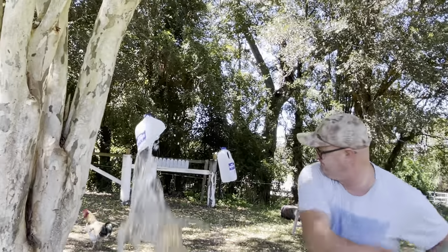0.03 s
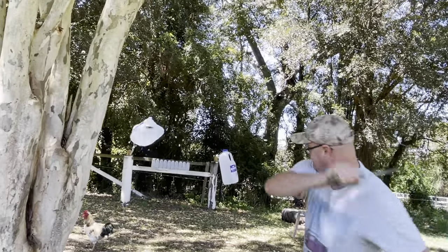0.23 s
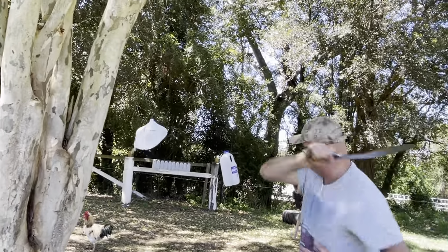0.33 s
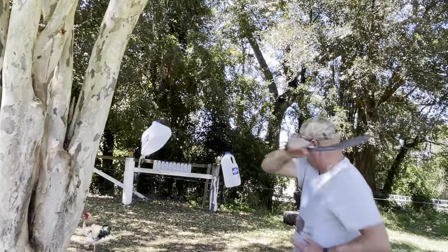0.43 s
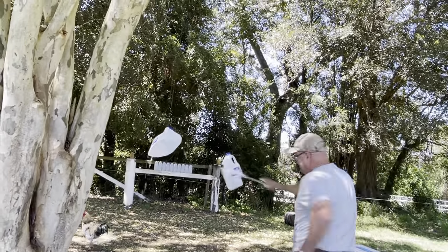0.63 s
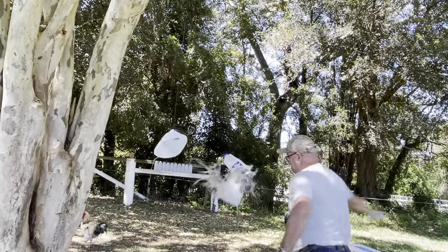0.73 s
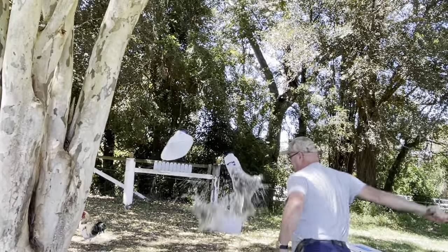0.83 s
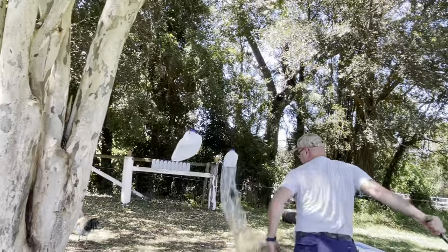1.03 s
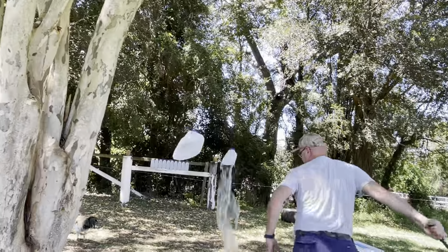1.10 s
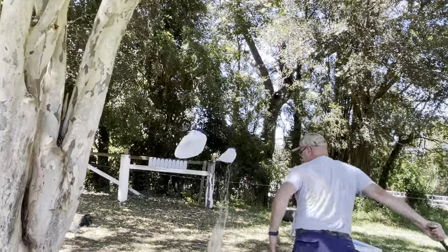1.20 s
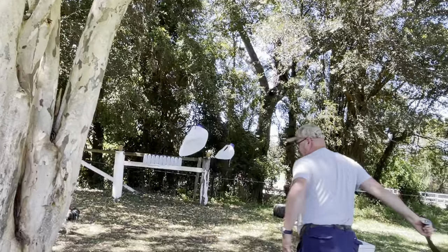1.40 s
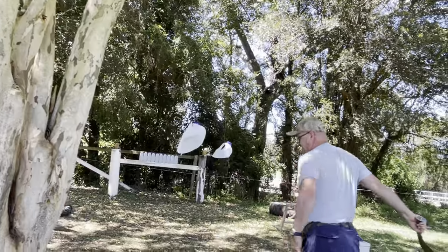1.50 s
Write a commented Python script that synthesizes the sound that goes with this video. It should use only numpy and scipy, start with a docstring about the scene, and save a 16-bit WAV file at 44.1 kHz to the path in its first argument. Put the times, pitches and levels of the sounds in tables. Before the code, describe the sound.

A blade chops through three water-filled plastic jugs outdoors, with water splashing down.

```python
"""Low wind, a faint hiss of trees and a sharp tick come first; then a long blade chops through three
hanging, water-filled plastic jugs. Each cut tears the near wall, thumps the water and bursts the far
wall, and the opened air cavity gurgles as a gliding resonance. The steel rings thinly, most after the
second cut. Spray hisses, and spilled water patters on dry leaves and traps small ringing bubbles."""
import sys
import numpy as np
from scipy import signal
from scipy.fft import rfft, irfft
from scipy.io import wavfile
from scipy.ndimage import uniform_filter1d

SR = 44100
rng = np.random.default_rng(int(sys.argv[2]) if len(sys.argv) > 2 else 0)


def transcribe(u):
    """Save the signal u as a 16-bit wav file named by the first command-line argument.

    u: samples, shape (n,) or (channels, n), limited to [-1, 1]; the rate is SR.
    q: integer samples, one column per channel.
    """
    v = np.clip(np.atleast_2d(u).T, -1, 1)
    q = np.round(v * 32767).astype(np.int16)
    wavfile.write(sys.argv[1], SR, q)


N = 68355
T = np.arange(N) / SR
BIN_HZ = np.arange(N + 1) * SR / (2 * N)


def undb(db):
    """Amplitude ratio of a level in decibels."""
    return 10 ** (np.asarray(db) / 20)


def gains(points, hz):
    """Magnitude response of a (frequency [Hz], level [dB]) curve, interpolated in log frequency."""
    corner_hz, db = np.array(points, float).T
    return undb(np.interp(np.log(np.maximum(hz, 1)), np.log(corner_hz), db))


def level(curve):
    """Amplitude envelope through (time [s], level [dB]) points."""
    return undb(np.interp(T, *np.array(curve).T))


def strike(at, rise, decay):
    """Transient envelope: exponential growth to a peak, then exponential decay."""
    return np.exp(-np.maximum((at - T) / max(rise, 1e-5), (T - at) / max(decay, 1e-5)))


def colour(x, points, tilt_db_per_oct=0):
    """Minimum-phase filter with a tilted spectrum, normalised to conserve the power of white noise."""
    octaves = np.log2(np.maximum(BIN_HZ, 200) / 1000)
    magnitude = gains(points, BIN_HZ) * undb(tilt_db_per_oct * octaves)
    magnitude /= np.sqrt(np.mean(magnitude ** 2))
    cepstrum = irfft(np.log(magnitude))[:N]
    cepstrum[1:] *= 2
    return irfft(rfft(x, 2 * N) * np.exp(rfft(cepstrum, 2 * N)))[..., :N]


def stereo(pair, side_curve):
    """Mid-side synthesis: a filtered difference signal adds on the left and subtracts on the right."""
    mid = pair[0]
    side = irfft(rfft(pair[1], 2 * N) * gains(side_curve, BIN_HZ))[:N]
    return np.array([mid + side, mid - side])


def crackle(grain_db, size):
    """Random amplitude modulation: two noises of unit rms share uneven grains, `size` samples long."""
    strength = np.repeat(undb(grain_db * rng.standard_normal(N // size + 1)), size)[:N]
    grains = rng.standard_normal((2, N)) * strength
    return grains / np.sqrt(uniform_filter1d(grains ** 2, size=size * 24, axis=1))


def resonance(hz, width, envelope):
    """A randomly driven resonator gives narrow-band noise; its rms follows the envelope."""
    lowpass = signal.butter(2, width / 2, fs=SR, output="sos")
    drive = signal.sosfilt(lowpass, rng.standard_normal(N) + 1j * rng.standard_normal(N))
    carrier = np.exp(2j * np.pi * np.cumsum(hz * np.ones(N)) / SR)
    ring = np.real(drive * carrier) * envelope
    return ring * np.sqrt(np.sum(envelope ** 2) / np.sum(ring ** 2))


def falling_tone(at, hz, oct_per_s, span_s):
    """Exponential glide: a cosine crests at time `at` and falls in pitch for span_s on either side."""
    cycles = np.cumsum(hz * 2 ** (-oct_per_s * np.clip(T - at, -span_s, span_s))) / SR
    return np.cos(2 * np.pi * (cycles - np.interp(at, T, cycles)))


# strength of the gusts (time [s], level [dB])
WIND_ENVELOPE = [(0, -43.5), (.08, -48), (.2, -41.5), (.34, -50), (.4, -42.5), (.6, -45.5), (.87, -45.5),
                 (1.02, -40), (1.06, -45.5), (1.11, -37), (1.23, -44.5), (1.28, -37), (1.39, -44.5),
                 (1.55, -38)]
# spectra of the wind and the trees (frequency [Hz], relative level [dB])
WIND_SPECTRUM = [(15, -48), (28, -26.5), (46, -3), (85, -1.5), (125, -13.5), (200, -21), (400, -32),
                 (1500, -63)]
TREE_SPECTRUM = [(100, 14.5), (400, 2), (900, 4.5), (2000, -9.5), (5000, -15), (8000, -11),
                 (13000, -14), (16000, -29)]
# stereo width of spread-out sources (frequency [Hz], side relative to mid [dB])
WIDE_SPREAD = [(60, -10), (400, -5), (1200, -4.5), (2400, -1.5), (4400, -0.5), (8000, -10), (11500, -4.5),
               (16000, -35)]


def wind_and_trees():
    """Turbulent flow makes broadband noise: gusts rumble under a faint, steady hiss of trees."""
    wind = level(WIND_ENVELOPE) * colour(rng.standard_normal((2, N)), WIND_SPECTRUM)
    trees = undb(-53.5) * colour(crackle(grain_db=2.5, size=64), TREE_SPECTRUM)
    return stereo(wind + trees, WIDE_SPREAD)


# single drops and snaps (time [s], tick level [dB], body relative to tick [dB])
DROP_IMPACTS = [(0.066, -17.5, -9.5), (0.1136, -32, -12), (.1735, -31, -19), (0.3738, -25.5, -2),
                (0.4974, -31, 5.5), (0.5089, -29, -1), (0.532, -30, -1), (0.5951, -25, -10),
                (.7009, -16, -12), (.709, -15, -8), (.963, -46, 9), (1.476, -45, 7)]
# spectra of the tick and the body (frequency [Hz], relative level [dB])
TICK_SPECTRUM = [(500, -45), (3000, -29), (8000, -17), (13500, 9), (16000, 7.5)]
BODY_SPECTRUM = [(150, 7), (450, -9.5), (850, 2), (1500, -0.5), (2800, -0.5), (6000, -7), (9000, -2.5),
                 (16000, -28)]
# stereo width of nearby sources (frequency [Hz], side relative to mid [dB])
NEAR_SPREAD = [(60, -31), (400, -21), (1000, -12), (2200, -2.5), (4400, 1), (8000, -5.5), (11500, -3.5),
               (16000, -32)]


def drops(tick_decay_s=0.00039, body_decay_s=0.0013):
    """A brief impact has a broad spectrum: a bright tick with a duller, slightly longer body."""
    tick = sum(undb(db) * strike(at, 0, tick_decay_s) for at, db, _ in DROP_IMPACTS)
    body = sum(undb(db + rel) * strike(at, 0, body_decay_s) for at, db, rel in DROP_IMPACTS)
    tick_noise, body_noise = np.sign(rng.standard_normal((2, 2, N)))
    impacts = colour(tick_noise * tick, TICK_SPECTRUM) + colour(body_noise * body, BODY_SPECTRUM)
    return stereo(impacts, NEAR_SPREAD)


# flow of airborne spray and of water landing on the leaves (time [s], level [dB])
SPRAY_ENVELOPE = [(0, -85), (.14, -60), (.2, -36.5), (.235, -31.5), (.28, -35.5), (.34, -40.5),
                  (.43, -26.5), (.5, -41), (.55, -41.5), (.69, -48.5), (.72, -41), (.79, -51), (.9, -57.5),
                  (1.12, -50), (1.16, -35), (1.26, -38.5), (1.34, -34.5), (1.42, -44.5), (1.55, -48.5)]
SPILL_ENVELOPE = [(0, -62), (.17, -60.5), (.24, -34), (.29, -44), (.34, -49), (.4, -43.5), (.46, -44.5),
                  (.5, -32.5), (.56, -81), (.6, -44), (.68, -54.5), (.76, -49), (.88, -54.5), (1.12, -62.5),
                  (1.18, -40.5), (1.26, -46), (1.345, -35.5), (1.39, -42.5), (1.55, -52)]
# their spectra (frequency [Hz], relative level [dB])
SPRAY_SPECTRUM = [(400, -21.5), (2000, 2), (3400, -1.5), (6300, 1.5), (8500, 4), (11000, 0.5), (13500, 4),
                  (16000, 3)]
SPILL_SPECTRUM = [(80, -20), (200, 6), (450, -6.5), (900, 2.5), (1600, -2.5), (2500, 3.5), (3500, -1),
                  (6000, -5.5), (9000, 0), (16000, -26.5)]


def splashes():
    """Many small impacts add incoherently: fine spray hisses, heavier water patters on the leaves."""
    spray = colour(crackle(grain_db=3, size=24) * level(SPRAY_ENVELOPE), SPRAY_SPECTRUM)
    spill = colour(crackle(grain_db=5.5, size=48) * level(SPILL_ENVELOPE), SPILL_SPECTRUM)
    return stereo(spray + spill, WIDE_SPREAD)


def bubbles(count=520, low_hz=378, high_hz=3310, decay_cycles=6.1, rise_per_s=8):
    """Air trapped by drops rings as a damped oscillator of rising pitch; loudness follows the spill."""
    t = np.arange(4096) / SR
    out = np.zeros((2, N + len(t)))
    flow = level(SPILL_ENVELOPE)
    for when, pitch, size, place in rng.random((count, 4)):
        start = int(when * (N - 1))
        hz = low_hz * (high_hz / low_hz) ** np.sqrt(pitch)
        phase = 2 * np.pi * hz * t * (1 + rise_per_s * t / 2)
        ring = np.exp(-t * hz / decay_cycles) * np.sin(phase)
        gain = flow[start] * undb(-6 - 3 * np.log(max(size, .05)))  # many weak, a few strong
        pan = np.sqrt([[.5 + place], [1.5 - place]])
        out[:, start:start + len(t)] += gain * pan * ring
    return out[:, :N]


def echo(x, db=-21.5, t60_s=0.47, delay_s=0.015):
    """Scattering from trunks and ground returns a weak, exponentially decaying tail."""
    tail = rng.standard_normal((2, N)) * (T > delay_s) * np.exp(-np.log(1000) * T / t60_s)
    tail /= np.sqrt(np.sum(tail ** 2, axis=1, keepdims=True))
    return undb(db) * signal.fftconvolve(x, tail, axes=1)[:, :N]


# rings of the steel (time [s], frequency [Hz], level [dB], rise [s], decay [s], bandwidth [Hz])
BLADE_MODES = [(0, 7241, -53, .003, .035, 30), (.712, 7020, -39, .003, .045, 230),
               (.712, 13750, -44, .003, .04, 400), (.712, 7400, -48.5, .003, .12, 260),
               (.932, 7440, -47, .04, .028, 30)]


def blade():
    """Modal vibration: the steel sings after a hard cut and swells again in the follow-through."""
    return sum(undb(db) * resonance(hz, width, strike(at, rise, decay))
               for at, hz, db, rise, decay, width in BLADE_MODES)


# air cavities of the opened jugs
# (start [s], duration [s], first frequency [Hz], last frequency [Hz], bandwidth [Hz], level [dB])
CAVITY_GLIDES = [(0.28, 0.093, 510, 405, 60, -48.5), (0.729, 0.106, 865, 455, 100, -42),
                 (0.733, 0.036, 1650, 1460, 224, -32), (1.184, 0.096, 460, 404, 187, -45.5),
                 (1.277, 0.15, 530, 570, 170, -43)]


def gurgles(fade_s=0.018):
    """Cavity resonance: rushing water excites the air, whose pitch glides as its volume changes."""
    out = 0
    for at, length, first, last, width, db in CAVITY_GLIDES:
        gate = np.clip(np.minimum(T - at, at + length - T) / fade_s, 0, 1)
        hz = np.interp(T, [at, at + length], [first, last])
        out += undb(db) * resonance(hz, width, gate)
    return out


# thumps: water, jug shells and one soft, wind-like bump at 0.61 s
# (time [s], frequency [Hz], peak level [dB], rise [s], decay [s])
THUMP_TONES = [(0.2362, 445, -11.5, 0.0045, 0.0095), (.251, 440, -17, 0.0031, 0.009),
               (.277, 426, -19, 0.0026, 0.005), (0.23, 226, -21, 0.0102, 0.0093),
               (.246, 68.5, -27.5, 0.017, 0.027), (.7115, 1657, -15.5, 0.0035, 0.0086),
               (.714, 240, -25, 0.0042, 0.004), (.719, 2200, -21, 0.0023, 0.0074),
               (.729, 905, -22, 0.0044, 0.015), (.7393, 1535, -13.5, 0.0021, 0.0031),
               (1.167, 199, -18.5, 0.0073, 0.0064), (1.1648, 790, -25, 0.0048, 0.006),
               (0.73, 600, -31.5, 0.012, 0.014), (1.305, 545, -31, 0.0081, 0.0097),
               (.611, 117, -33.5, 0.014, 0.0073)]


def thumps():
    """Damped oscillation: water, shells and one wind-like bump swell and ring, sagging in pitch."""
    out = 0
    for at, hz, db, rise, decay in THUMP_TONES:
        envelope = np.exp(-np.where(T < at, ((T - at) / rise) ** 2, (T - at) / decay))
        out += undb(db) * envelope * falling_tone(at, hz, oct_per_s=4.2, span_s=.1)
    return out


# knocks of the blade on the water (time [s], frequency [Hz], peak level [dB], half duration [s])
WATER_KNOCKS = [(0.2214, 516, -11.5, 0.0012), (0.2299, 480, -8.5, 0.0019), (.269, 509, -11, 0.0027),
                (1.1653, 487, -5.5, .0029)]


def slaps():
    """Sudden displacement radiates a pulse: the flat of the blade shoves water in a falling knock."""
    out = 0
    for at, hz, db, half in WATER_KNOCKS:
        envelope = np.exp(-((T - at) / half) ** 2)
        out += undb(db) * envelope * falling_tone(at, hz, oct_per_s=190, span_s=2 * half)
    return out


# bursts of tearing, one list per jug (time [s], rise [s], decay [s], level [dB], tilt [dB/octave])
TEAR_BURSTS = [
    [(.2165, 0.0041, 0.015, -21.5, 1), (.2262, 0.0043, 0.011, -14, 0), (.2597, 0.0003, 0.0017, -16.5, -0.5),
     (.2675, 0.0025, 0.005, -15, -4)],
    [(.7016, 0.0008, 0.0047, -19.5, 2), (.7062, 0.0013, .0018, -17, -3),
     (.7095, 0.0002, 0.0012, -12.5, 4.5), (.7112, 0.00081, 0.0042, -14.5, -1),
     (.738, 0.024, 0.031, -31.5, -6.5)],
    [(1.152, 0.0013, 0.018, -28, -1.5), (1.1655, 0.0052, 0.0053, -15.5, -0.5),
     (1.177, 0.0015, 0.0034, -28.5, -2.5)],
]
# spectrum of the tearing plastic, one list per jug (frequency [Hz], relative level [dB])
JUG_SPECTRA = [
    [(60, -11), (220, -3), (350, -0.5), (620, -6.5), (780, -1), (1050, 1), (1300, -4.5), (2100, -3.5),
     (2650, -7.5), (3300, -12.5), (6000, -17), (9000, -19.5), (13500, -16.5), (16000, -39)],
    [(60, -38), (220, -10), (370, -19.5), (550, -4), (1250, 0), (1650, -4), (1900, -2.5), (2300, 2.5),
     (3300, -7), (4100, -4), (6000, -11.5), (6900, -11), (8500, -26.5), (14000, -19), (16000, -40)],
    [(60, -11.5), (200, -5.5), (750, -1.5), (1000, -8), (1450, -2.5), (1850, -10), (2250, -6),
     (3200, -11.5), (6300, -16), (8500, -15), (16000, -30.5)],
]
# position of each jug (left minus right level [dB])
JUG_BALANCE = [1, -1, -0.5]


def tearing():
    """Fracture releases stress in bursts of dense clicks, filtered by each jug as the edge rips it."""
    out = 0
    for bursts, spectrum, pan_db in zip(TEAR_BURSTS, JUG_SPECTRA, JUG_BALANCE):
        rip = 0
        for at, rise, decay, db, tilt in bursts:
            clicks = crackle(grain_db=3, size=8) * strike(at, rise, decay)
            rip += undb(db) * colour(clicks, spectrum, tilt)
        out += stereo(rip, NEAR_SPREAD) * undb([[pan_db / 2], [-pan_db / 2]])
    return out


def scene():
    """Superposition: three cuts and their echo add to the falling water and the wind."""
    direct = tearing() + slaps() + thumps() + gurgles() + blade()
    return direct + echo(direct) + splashes() + bubbles() + drops() + wind_and_trees()


# level difference between the microphones (frequency [Hz], left minus right level [dB])
MIC_BALANCE = [(60, 0), (400, 2), (1200, -0.5), (2400, -5), (4400, 5), (8000, 1), (16000, -1)]
# phase difference between the microphones (frequency [Hz], lead of the left [rad])
MIC_PHASE = [(0, 0), (1000, 0.16), (2050, 0.46), (2930, 0.5), (3450, 4.5), (4200, 6), (5500, 6),
             (6700, 6.5), (7350, 9.2), (9300, 8.3), (11500, 13.5), (14000, 12.5)]


def record(dry, ceiling=.95, cutoff_hz=15750):
    """Two microphones differ in level and phase; saturation rounds peaks and a low-pass cuts the top."""
    lead = np.interp(BIN_HZ, *np.array(MIC_PHASE).T)
    left = np.sqrt(gains(MIC_BALANCE, BIN_HZ)) * np.exp(.5j * lead)  # half the difference per side
    heard = irfft(rfft(dry, 2 * N) * np.array([left, 1 / left]))[:, :N]
    rounded = heard / (1 + (heard / ceiling) ** 6) ** (1 / 6)
    lowpass = signal.ellip(10, .2, 80, cutoff_hz, fs=SR, output="sos")
    return signal.sosfilt(lowpass, rounded)


dry = scene()
out = record(dry)
transcribe(out)
```